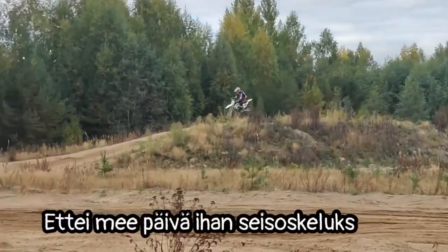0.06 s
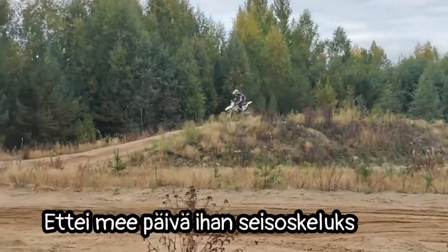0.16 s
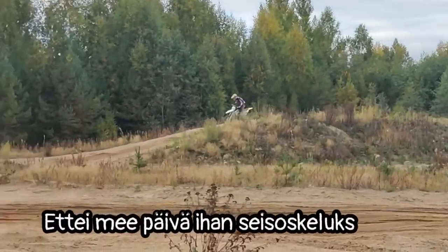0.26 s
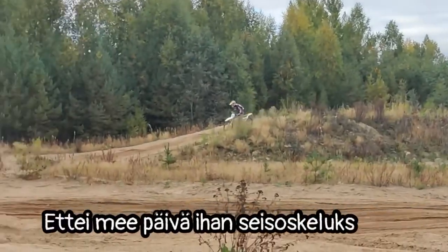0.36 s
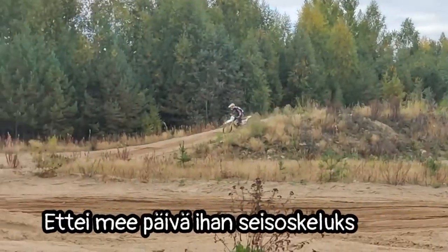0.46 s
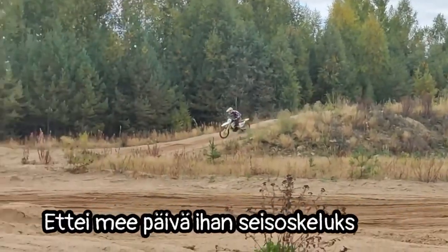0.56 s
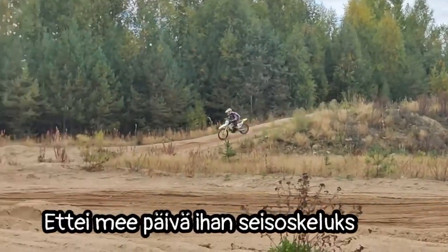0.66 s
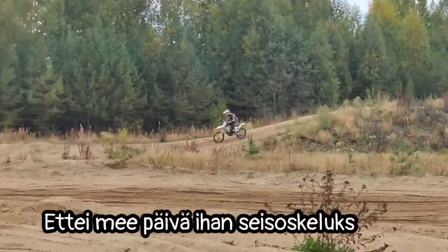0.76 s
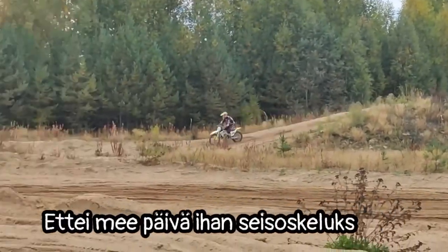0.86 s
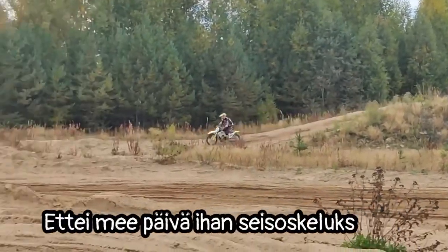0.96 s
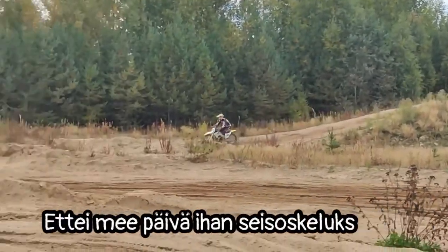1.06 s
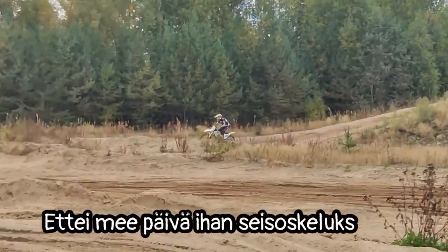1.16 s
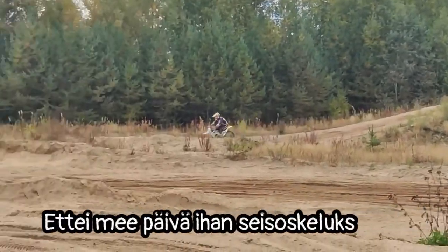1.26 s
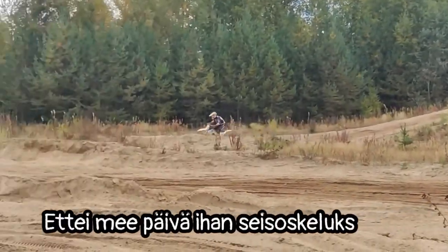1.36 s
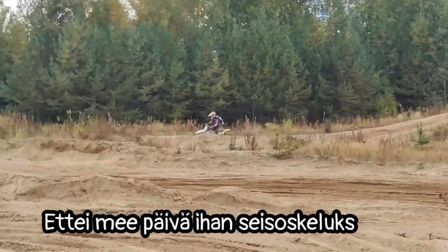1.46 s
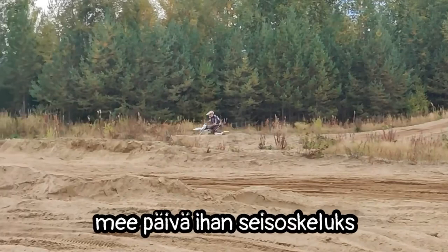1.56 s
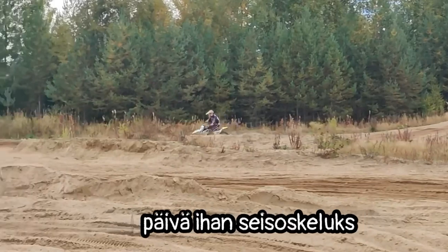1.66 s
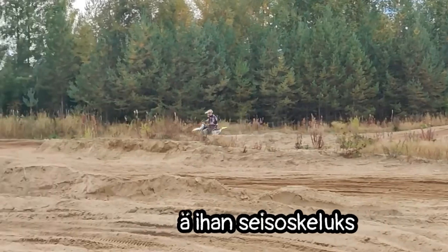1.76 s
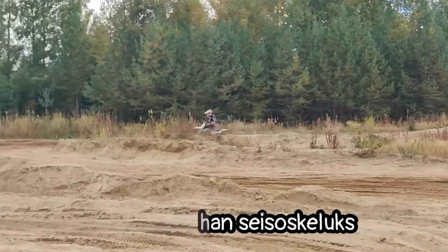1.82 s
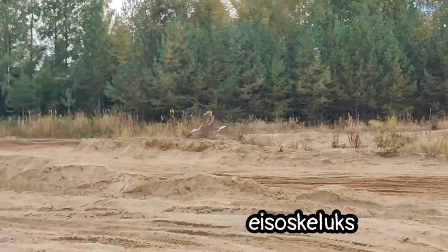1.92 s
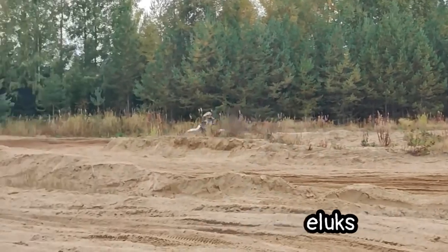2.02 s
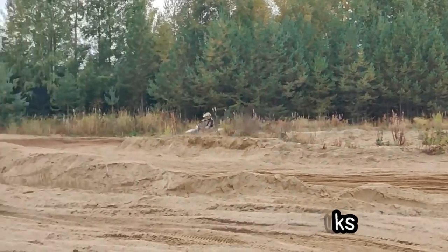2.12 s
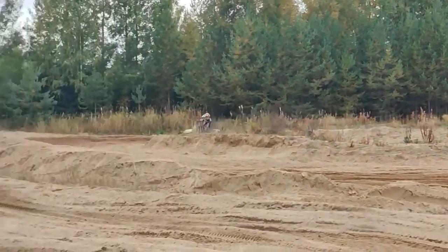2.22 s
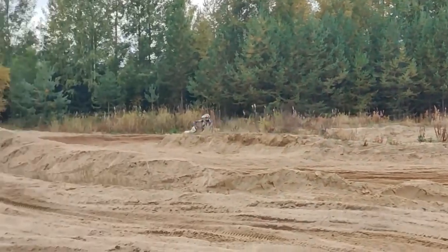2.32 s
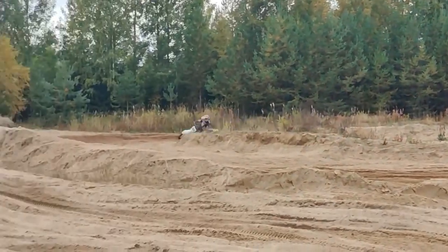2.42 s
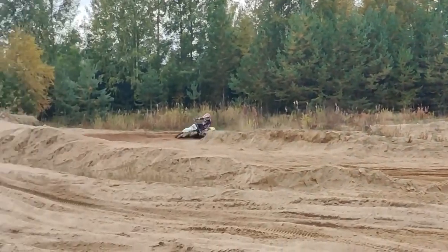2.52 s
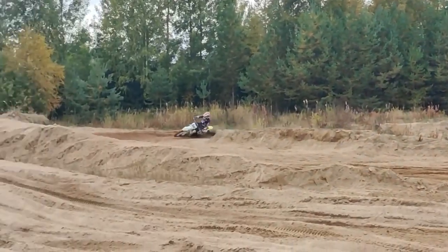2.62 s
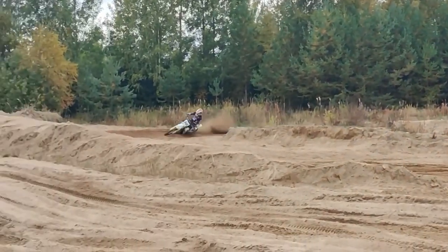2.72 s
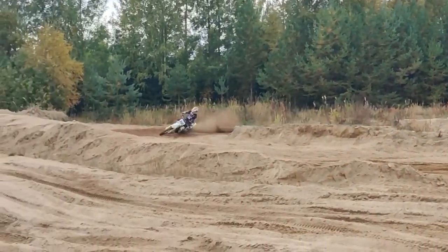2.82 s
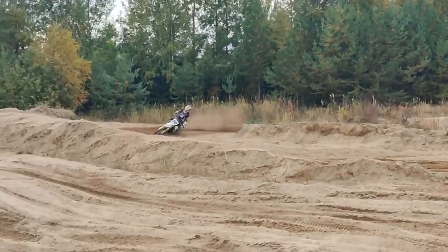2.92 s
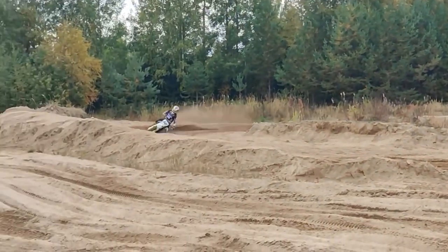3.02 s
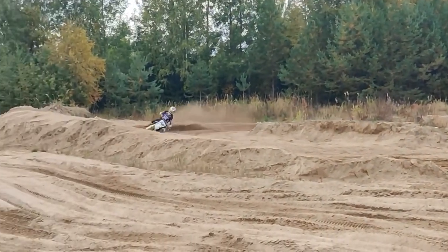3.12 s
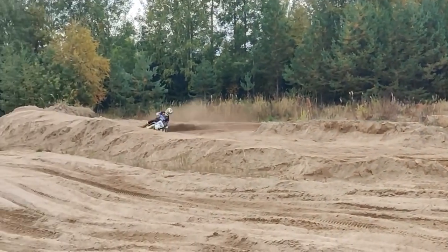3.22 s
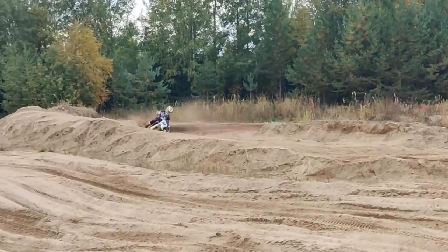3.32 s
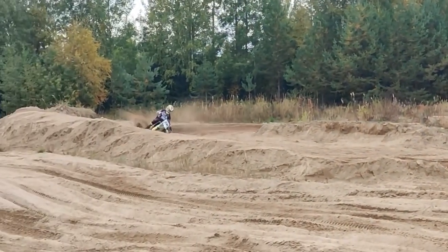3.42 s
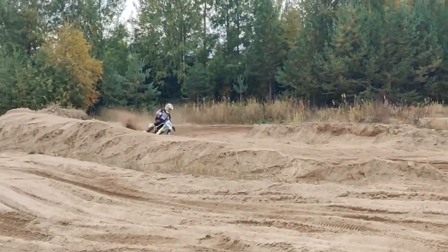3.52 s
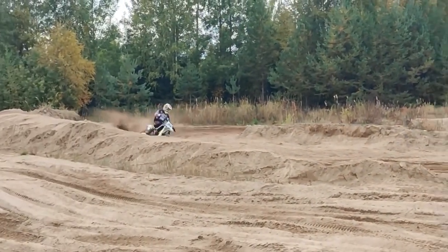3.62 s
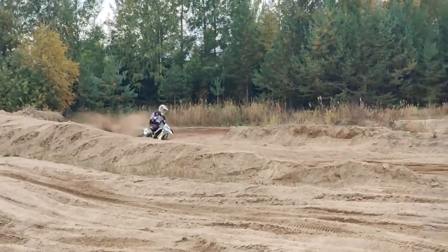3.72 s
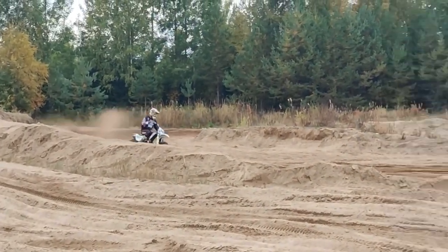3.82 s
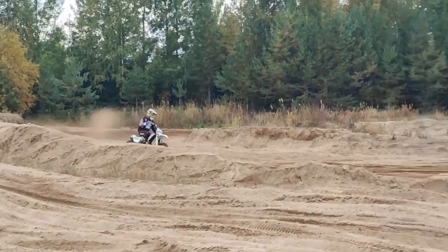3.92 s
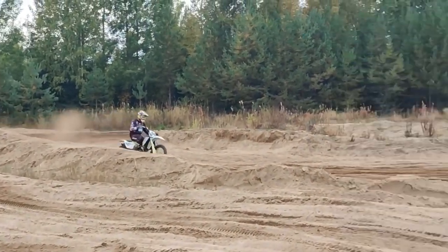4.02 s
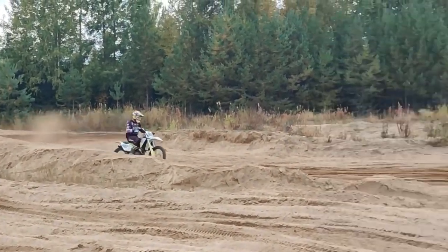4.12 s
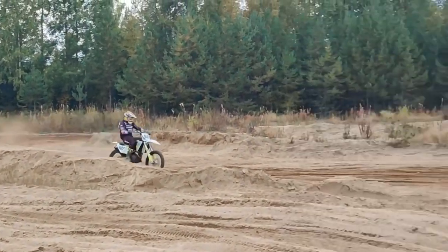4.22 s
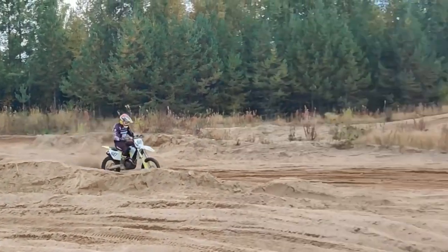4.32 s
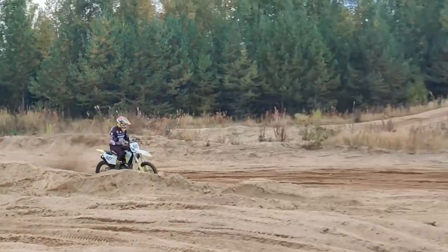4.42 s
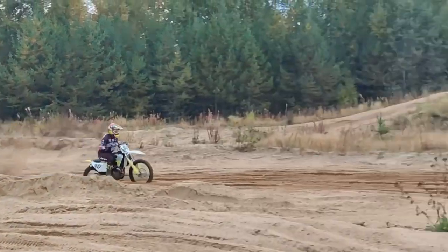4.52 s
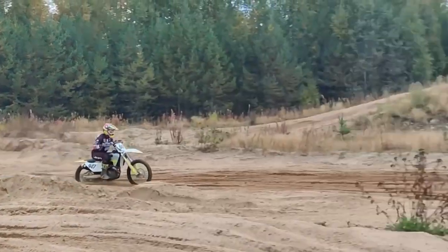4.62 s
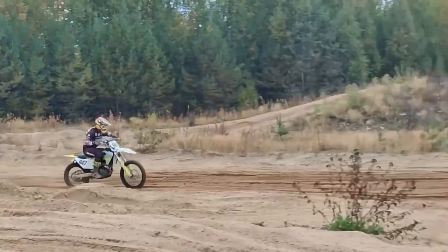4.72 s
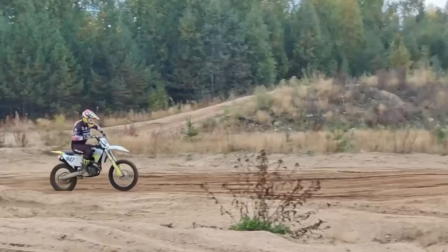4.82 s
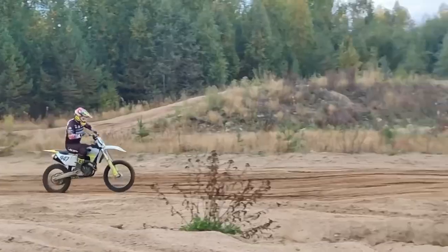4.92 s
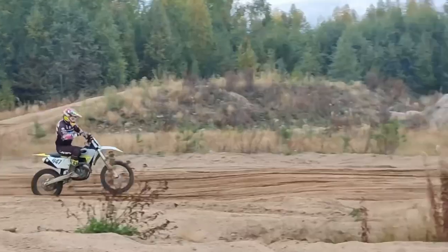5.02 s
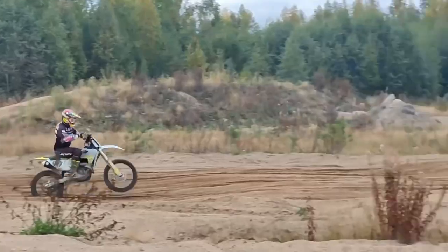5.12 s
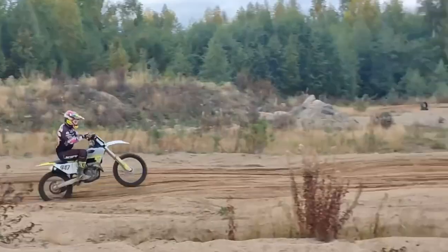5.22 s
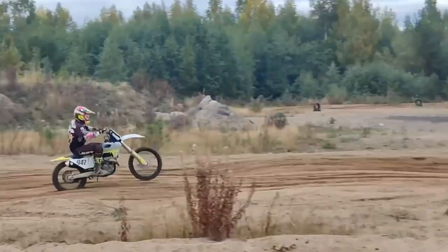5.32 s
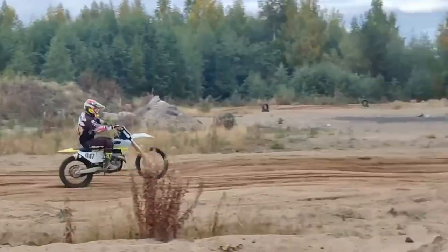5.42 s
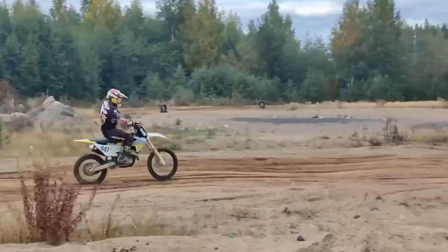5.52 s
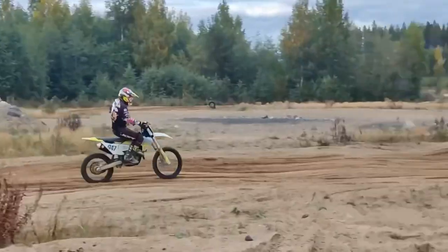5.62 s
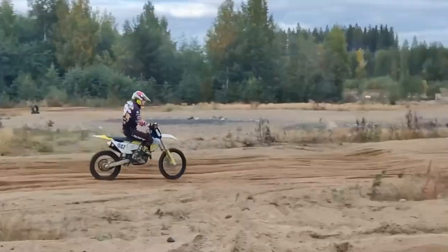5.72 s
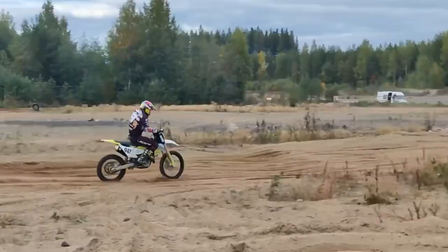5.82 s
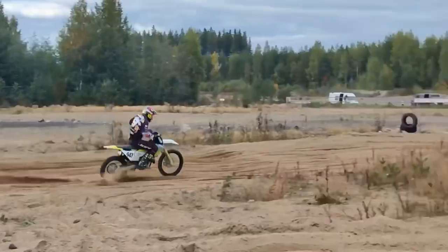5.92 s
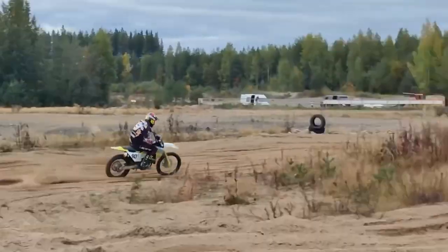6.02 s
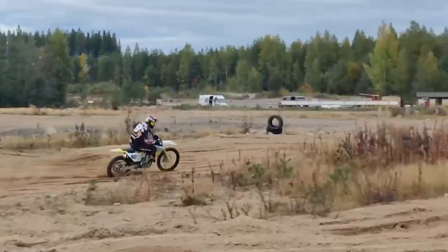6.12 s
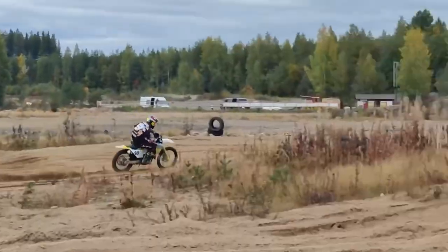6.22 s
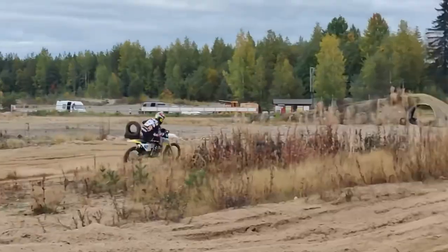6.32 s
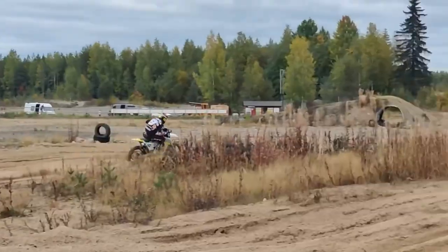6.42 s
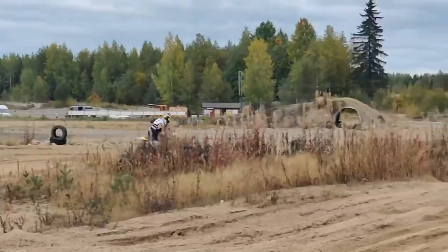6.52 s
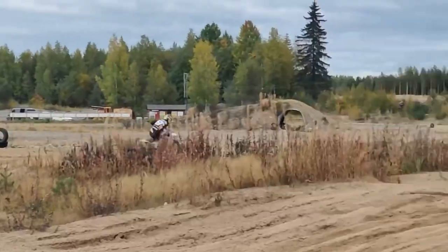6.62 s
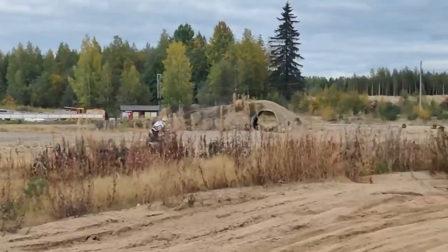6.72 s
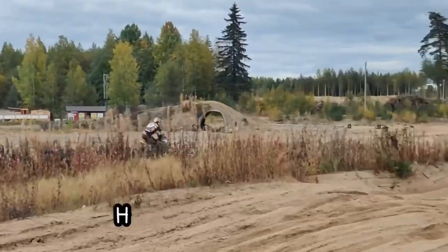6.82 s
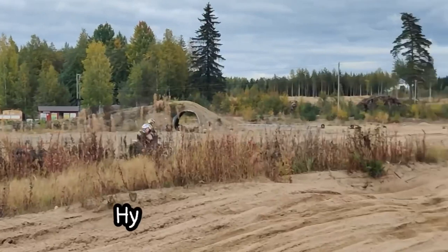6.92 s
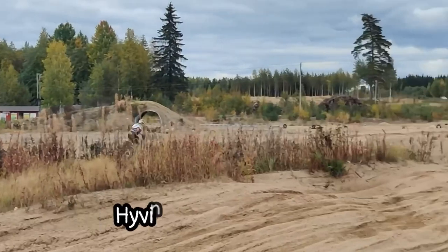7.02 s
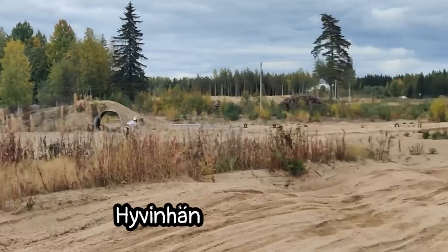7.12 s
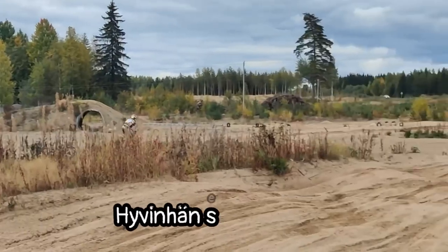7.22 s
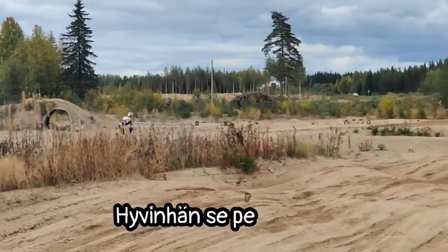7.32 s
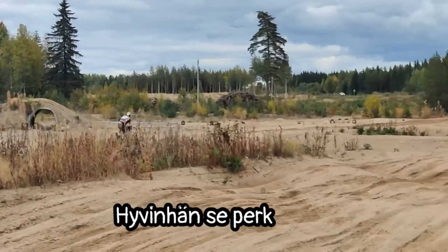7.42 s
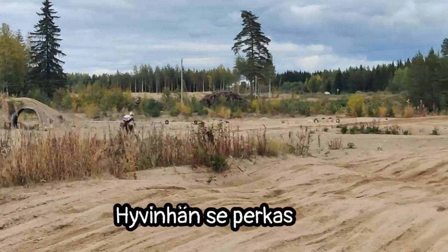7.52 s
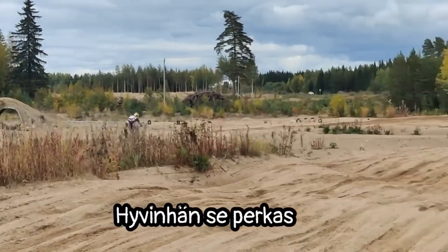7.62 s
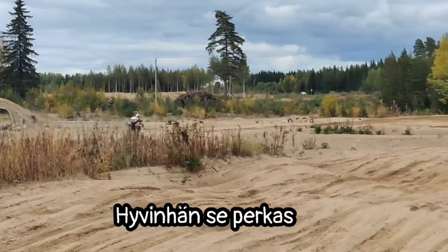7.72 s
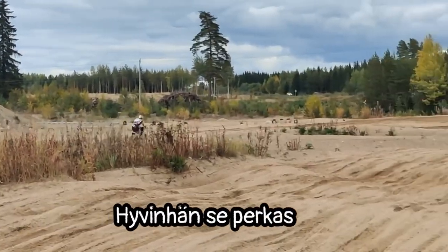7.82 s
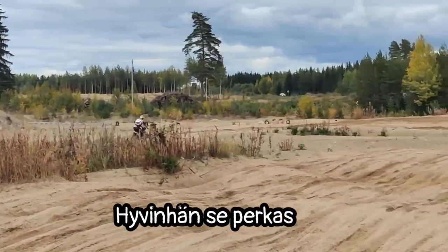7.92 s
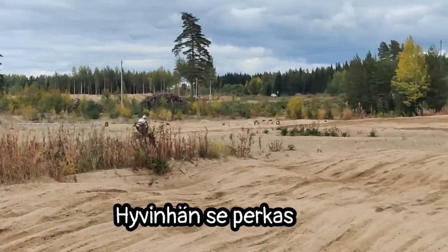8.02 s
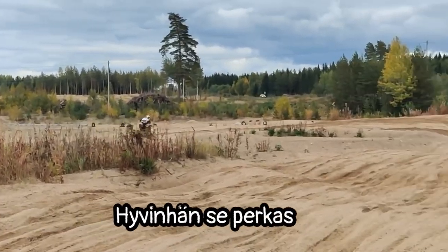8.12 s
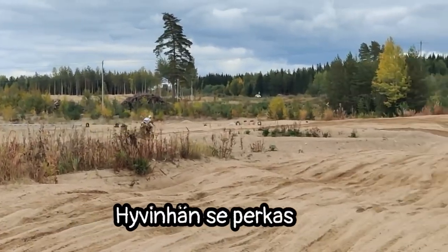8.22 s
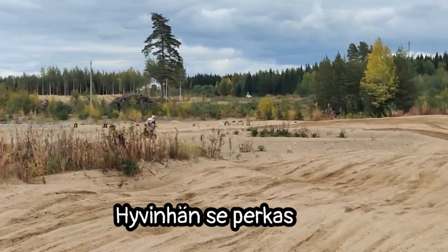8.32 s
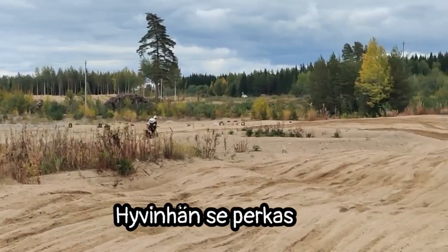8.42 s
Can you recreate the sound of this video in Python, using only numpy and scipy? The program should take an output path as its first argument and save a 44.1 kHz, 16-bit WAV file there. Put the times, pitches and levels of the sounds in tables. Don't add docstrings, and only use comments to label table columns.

```python
import sys
import numpy as np
from scipy import signal
from scipy.fft import rfft, irfft, next_fast_len
from scipy.io import wavfile
from scipy.ndimage import uniform_filter1d, map_coordinates

SR = 44100
rng = np.random.default_rng(int(sys.argv[2]) if len(sys.argv) > 2 else 0)


def invert_db(level):
    return 10 ** (np.asarray(level, dtype=float) / 20)


def master_out(mix):
    frames = np.transpose(np.atleast_2d(mix))
    ceiling = np.clip(frames, -1, 1)
    pcm = np.round(ceiling * 32767).astype(np.int16)
    wavfile.write(sys.argv[1], SR, pcm)


N = 373086


def at(table):
    s, *columns = np.transpose(table)
    return [np.interp(np.arange(N) / SR, s, c) for c in columns]


def shape(x, points):
    hz, db = np.transpose(points)
    size = next_fast_len(N + 8192)
    f = np.maximum(np.fft.rfftfreq(size, 1 / SR), 1)
    gain = invert_db(np.interp(np.log(f), np.log(hz), db))
    return irfft(rfft(x, size) * gain, size)[..., :N]


def steady(x):
    power = uniform_filter1d(uniform_filter1d(x ** 2, size=1800), size=1800)
    return x / np.sqrt(power + 1e-12)


def band(x, lo_hz, hi_hz, order=2):
    return signal.sosfilt(signal.butter(order, [lo_hz, hi_hz], "band", fs=SR, output="sos"), x)


def ring(x, hz, width_hz):
    return signal.lfilter(*signal.iirpeak(hz, hz / width_hz, SR), x)


def gate(rows, smooth_s):
    t = np.arange(N) / SR
    held = np.zeros(N)
    for start_s, end_s, *level in rows:
        held += (level[0] if level else 1) * (t >= start_s) * (t < end_s)
    return uniform_filter1d(held, size=int(smooth_s * SR))


def sway(depth_db, count):
    drift = band(rng.standard_normal((count, N // 100 + 1)), 70, 500, order=1)
    return np.repeat(invert_db(depth_db * drift / drift.std()), 100, axis=1)[:, :N]


# time_s, level_db
WIND = [(0.0, -51), (0.66, -45.5), (1.39, -66), (1.72, -61), (2.24, -61), (4.0, -39.5), (4.64, -53),
        (4.97, -46), (5.54, -58), (6.88, -53.5), (7.28, -41), (8.46, -43)]


def wind():
    mid, side = band(rng.standard_normal((2, N)), 4.0, 68)
    flutter = band(rng.standard_normal(N), 2, 4.8, order=1)
    gain = invert_db(at(WIND)[0] + 1.2 * flutter / flutter.std() + 13.0) / mid.std()
    return gain * np.array([mid + 0.73 * side, mid - 0.44 * side])


FOREST_T60_S, FOREST_DB = .9, -14.5


def forest(x):
    t = np.arange(SR) / SR
    decay = invert_db(-60 * t / FOREST_T60_S) * np.clip(t / 0.022, 0, 1)
    mid, side = rng.standard_normal((2, SR)) * decay
    mid, side = band(mid, 70, 7700, order=1), band(side, 1200, 7000, order=1)
    tail = np.array([mid + side, mid - side])
    tail = tail / np.sqrt(np.sum(tail ** 2, axis=1, keepdims=True))
    return signal.fftconvolve(x[None], tail, axes=1)[:, :N]


# open_s, shut_s, opening (0-1)
THROTTLE = [(-.1, .2, 0.15), (.2, .27, 0.66), (.27, .97, 0.78), (1.33, 1.555, 0.04), (1.8, 2.32, 0.06),
            (2.32, 2.44, 0.34), (2.44, 2.76, 0.63), (2.76, 6.8, 0.88), (7.52, 7.61, 0.49),
            (7.61, 7.88, 0.02), (8.27, 8.36, 0.62)]
TWIST_S, ENGINE_BRAKE_S = 0.026, 0.09


def throttle():
    grip = np.clip(gate(THROTTLE, TWIST_S), 0, 1.1)
    keep = np.exp(-1 / (ENGINE_BRAKE_S * SR))
    return np.maximum(grip, signal.lfilter([1 - keep], [1, -keep], grip))


# start_s, length_s, depth
STUTTERS = [
    (.33, .19, .35),
    (.97, .08, 1),
    (4.3, .19, .7),
    (5.835, .095, 1.6),
    (6.82, .06, 1),
]


def limiter():
    return gate([(s, s + length_s, depth) for s, length_s, depth in STUTTERS], .04)


BEATS_S = [.385, 1.762, 4.703, 4.7755, 4.8495, 5.853, 7.552, 7.632, 8.267, 8.2895, 8.3105, 8.33]
SKIP_DB = -6


def firings(hz, scatter_db, stutter):
    wobble = band(rng.standard_normal(N), 7.0, 30, order=1)
    turns = np.cumsum(hz * (1 + 0.0007 * wobble / wobble.std())) / SR
    early = np.unwrap(-turns[(np.array(BEATS_S) * SR).astype(int)] % 1, period=1)
    turns = turns + 1 + at(np.transpose([BEATS_S, early]))[0]
    cycle = turns.astype(int)
    skipped = (cycle - cycle[int(BEATS_S[5] * SR) + 99]) % 2
    weakness, unevenness = rng.standard_normal((1200, 2))[cycle].T
    size = invert_db(scatter_db * -np.abs(weakness) * 1.2 + SKIP_DB * stutter * skipped)
    late = turns % 1 * SR / hz
    clicks = np.maximum(0, 1 - np.abs(late - 1)) * size * invert_db(0.5 * unevenness)
    return turns, size, clicks


# pitch_hz, throttle_shut_db, throttle_open_db, added_behind_tail_pipe_db
PIPE = [(44.7, -3, -13, 7.5), (71.4, 3, 2.5, -4), (100, -4, -2, 4), (137.3, 1, -4.5, 5),
        (177, -7.5, -2, 0.5), (240, -13.5, -4.5, 10.5), (304, -28.5, -10, 21.5), (453, -25.5, -20, 9)]
# time_s, second_over_first_order_db
FLANK = [(0, -6), (.4, -4.5), (1, 1), (2.6, -1.5), (3.3, -3.5), (3.75, 8), (4.3, 1), (4.75, 7), (5.1, -6),
         (5.45, 0), (6.1, -1), (6.6, 0), (7.5, 3.5), (8.46, -3)]
PART_THIRD_DB, OVERRUN_FIRST_DB = -12.5, -31
SHUT_FIRST_DB, SHUT_THIRD_DB = -10, 2.5


def exhaust_orders(hz, level_db, load, tail):
    pipe_hz, *pipe_db = np.transpose(PIPE)
    orders_db = []
    for k in range(1, 5):
        shut_db, open_db, tail_db = (np.interp(np.log(k * hz), np.log(pipe_hz), db) for db in pipe_db)
        orders_db.append(level_db + shut_db + load * (open_db - shut_db) + tail * tail_db)
    first, second, third, fourth = orders_db
    overrun = tail * np.clip(1 - load / 0.21, 0, 1)
    part = np.clip(gate(THROTTLE, 0.044) / 0.073, 0, 1) * np.clip((.8 - load) / 0.77, 0, 1)
    shut = (1 - tail) * np.clip(1 - gate(THROTTLE, .03) / .04, 0, 1)
    flank_db, = at(FLANK)
    first = first + OVERRUN_FIRST_DB * overrun + SHUT_FIRST_DB * shut - flank_db / 2
    second = second + flank_db / 2
    third = third + PART_THIRD_DB * part + SHUT_THIRD_DB * shut
    return [first, second, third, fourth]


SAND_DB, SAND_OCTAVES = -16, .12


def sand(hz, dip_hz):
    return SAND_DB * np.exp(-.5 * (np.log2(hz / dip_hz) / SAND_OCTAVES) ** 2)


ORDER_TURNS = [-.18, .1, .35, .4, .45, .5, .55, .6, .65, .7, .75]
HEADER_HZ, HEADER_DB, HEADER_OCTAVES = 390, 4, 0.18


def boom(hz, turns, size, orders_db, bark_db, hiss_db, dip_hz):
    slow = np.clip((80 - hz) / 30, 0, 1)
    upper_db = []
    for k in range(5, 11):
        silencer_db = -22.6 * np.log10(1 + (k * hz / 440) ** 8)
        header = np.exp(-.5 * (np.log2(k * hz / HEADER_HZ) / HEADER_OCTAVES) ** 2)
        slope_db = -(0.21 + 2.0 * slow) * (k - 4)
        upper_db.append(bark_db + slope_db + silencer_db + HEADER_DB * slow * header)
    tones = np.zeros(N)
    for k, (db, turn) in enumerate(zip(orders_db + upper_db, ORDER_TURNS), 1):
        tones += invert_db(db + sand(k * hz, dip_hz)) * np.cos(2 * np.pi * (k * turns - turn))
    bursts = 3.3 + np.exp(-(turns % 1) / 0.23)
    rumble = steady(band(bursts * rng.standard_normal(N), 200, 710))
    rumble = invert_db(bark_db - 8.0 + 2 * slow + .5 * slow * hiss_db) * rumble
    size = uniform_filter1d(size, size=130)
    return (np.sqrt(2) * tones + rumble) * size / uniform_filter1d(size, size=4000)


# pitch_hz, width_hz, level_db
SILENCER = [(682, 397, 0), (1051, 65, 2.5), (1617, 361, 12), (2313, 562, 12.5), (2804, 1260, 1.5),
            (5520, 2620, -14.5), (6300, 3470, -18.5)]


def silencer(x, beam=None):
    rings = np.array([(-1) ** k * invert_db(db) * ring(x, hz, width_hz)
                      for k, (hz, width_hz, db) in enumerate(SILENCER)])
    return np.sum(rings if beam is None else rings * beam, axis=0)


# pitch_hz, level_db
GAS = [(200, -62), (600, -32), (1500, -26), (3000, -18.5), (6500, -8), (7500, -5.5), (9000, -47.5),
       (12000, -4), (15500, -25)]


def crack(hz, turns, size, clicks, hiss_db):
    since_s = turns % 1 / hz
    puff = size * (1 - np.exp(-since_s / .002)) ** 3 * np.exp(-since_s / .0018)
    beam = sway(3, count=len(SILENCER))
    front = steady(silencer(band(clicks, 500, 4000, order=1), beam))
    gas = steady(silencer(shape(puff * rng.standard_normal(N), GAS)))
    gas = gas + invert_db(4) * band(gas, 1400, 2700)
    hiss = steady(silencer(band(rng.standard_normal(N), 1300, 15000, order=1)))
    gas_db = -9 - .45 * np.minimum(hiss_db + 6, 0)
    return front, invert_db(gas_db) * gas, invert_db(hiss_db - 2) * hiss


VALVE_PEAK_S, VALVE_OPEN_S, VALVE_DEPTH = .0022, .002, .75


def valve(hz, turns, hiss_db):
    depth = np.clip(-(hiss_db + 5) / 9, 0, VALVE_DEPTH)
    opening = np.exp(-((turns % 1 / hz - VALVE_PEAK_S) / VALVE_OPEN_S) ** 2)
    return steady(1 - depth + depth * opening)


# time_s, lower_over_upper_ring_db, treble_db, upper_orders_db
BEAM = [(0, 20, 4.5, 6), (.35, 18.5, 7, 15), (1, 5.5, 2, 2), (2.3, 5, 8.5, 3), (2.8, 10, 18.5, 8),
        (3.4, -8, -4.5, 1), (3.9, -14, -1, 5), (4.35, -23, 0.5, 6.5), (4.75, -8, -3, 3.5),
        (5.1, 4.5, -1, -1.5), (5.5, -14, -5.5, 5.5), (6.1, -10, -2.5, 6.5), (6.65, -15.5, -1, 5),
        (7.1, -22, -4, -1), (7.56, -16, -0.5, 5.5), (7.9, -4, -1.5, -1), (8.3, 1, 1, 10.5),
        (8.46, -4, 6.5, -6)]
# pitch_hz, width_hz, level_db
RINGS = [(1645, 280, -2.5), (2260, 180, 0)]
CLEAN_DB, RASP_NOISE_DB = -7, -4


def aim(front, gas, hiss, rasp_db, crack_db, tilt_db, air_db, near_db, load, burst):
    lower_db, treble_db, _ = at(BEAM)
    far = front + gas + hiss + np.clip(1.2 - .2 * near_db, 0, 1.5) * hiss
    noisy = invert_db(CLEAN_DB * load)
    clean = front + np.sqrt(noisy) * gas + noisy * hiss
    struck = front + .35 * gas
    lower, upper = (load * invert_db(db) * ring(ring(struck, hz, width_hz), hz, width_hz)
                    for hz, width_hz, db in RINGS)
    rings = invert_db(lower_db / 2) * (band(clean, 1350, 1950) + lower)
    rings = rings - invert_db(-lower_db / 2) * (band(clean, 1950, 2750) + upper)
    treble = band(far, 2850, 7000) + invert_db(air_db) * band(far, 7000, 16000)
    top = burst * rings + burst ** .3 * invert_db(tilt_db + treble_db) * treble
    rasp = band(front + noisy * invert_db(RASP_NOISE_DB) * (gas + hiss), 504, 1127)
    return invert_db(rasp_db) * steady(rasp) + invert_db(crack_db) * steady(top)


# time_s, peak_db
POPS = [
    (1.761, -31),
    (2.054, -37),
    (2.126, -36),
    (5.854, -26),
    (5.926, -25),
    (6.205, -23),
]


def pops():
    out, t = np.zeros(N), np.arange(800) / SR
    for (s, db), noise in zip(POPS, rng.standard_normal((len(POPS), 800))):
        start = int(s * SR)
        out[start:start + 800] += invert_db(db + 10) * noise * np.exp(-t / .003)
    return .5 * silencer(out) + 2 * band(out, 300, 1300) + .5 * band(out, 2800, 6500)


# start_s, end_s, pitch_hz, over_exhaust_level_db
HONKS = [(0.252, 0.51, 950, -13), (0.255, .5, 687, -11), (0.273, 0.465, 2280, -20),
         (0.807, 0.968, 2260, -14), (0.803, 0.968, 1710, -24), (2.5, 2.8, 3930, -24.5),
         (2.85, 3.398, 645, -17.5), (3.206, 3.6, 906, -28), (3.297, 3.597, 3070, -13),
         (3.554, 3.71, 2290, -19.5), (3.664, 3.796, 1660, -14), (3.927, 4.05, 2240, -18),
         (3.98, 4.2, 1685, -14.5), (4.257, 4.455, 2250, -17), (4.685, 4.898, 1880, -4),
         (5.002, 5.22, 2300, -12), (5.275, 5.45, 2300, -15), (5.78, 6.12, 2200, -17),
         (6.0, 6.304, 790, -25), (6.447, 6.776, 640, -12.5), (7.53, 7.937, 748, -18),
         (7.514, 7.616, 483, -7.5), (7.536, 7.604, 1600, -17.5), (8.258, 8.36, 524, -11.5)]
HONK_WIDTH_HZ, HONK_WIDTH_SHARE = 70, .1


def honk(clicks, level_db):
    out = np.zeros(N)
    for start_s, end_s, hz, db in HONKS:
        span = slice(int((start_s - .04) * SR), int((end_s + .04) * SR))
        width_hz = HONK_WIDTH_HZ + HONK_WIDTH_SHARE * hz
        tone = steady(ring(ring(clicks[span], hz, width_hz), hz, width_hz))
        fade = signal.windows.tukey(len(tone), min(1, .16 * SR / len(tone)))
        out[span] += invert_db(db) * tone * fade
    return invert_db(level_db) * out


# time_s, nearness_db, tail pipe facing the phone (0-1),
# ground_echo_dip_hz, intake_rasp_db
BEARING = [(0, -6, 0.73, 203, 3), (.4, -8, 1, 177, 8), (.9, -10.5, 0.8, 188, 5.5),
           (1.3, -8.5, 0, 195, -1.5), (2.3, -14, 0.04, 240, 4.5), (2.65, -10.5, 0.6, 271, 0),
           (3.2, -13, 0.33, 344, 2.5), (3.5, -6, 0.79, 323, 5.5), (3.75, -3, 0.25, 363, 0.5),
           (4.25, -1.5, 0.07, 297, -1), (4.75, 2.5, 0.29, 228, -6.5), (5.12, 1.5, 0.66, 264, 1),
           (5.42, -1, 0.5, 231, -3), (5.75, 1.5, 0.82, 238.6, 0.5), (6.7, -6.5, 0.52, 234, -3),
           (7, -2, 0.66, 256, -5.5), (7.65, -8.5, 1, 240, -1.5), (8.46, -12.5, 0.8, 240, 2)]
CRACK_DB, CRACK_SHUT_DB, CRACK_PER_LEVEL = -19, -13, 0.99
BARK_DB, BARK_TAIL_DB, RASP_DB, RASP_TAIL_DB = -17, 3.5, -9.5, -0.5
BRIGHT_DB, BRIGHT_PER_NEAR = 9.5, -0.03
HISS_SHUT_DB, HISS_OPEN_DB, HISS_PER_HZ, HISS_PER_NEAR, HISS_STUTTER_DB = 4, -5, .27, -.5, 3
EVEN_DB, IDLE_SCATTER_DB, STUTTER_DB = 1, 1.3, 4
CRACK_LATE_S = .0008


def bike(hz, level_db, near_db, air_db):
    _, tail, dip_hz, rasp_db = at(BEARING)
    load, stutter = throttle(), limiter()
    orders_db = exhaust_orders(hz, level_db, load, tail)
    crack_db = CRACK_DB + near_db + CRACK_SHUT_DB * (1 - load) + CRACK_PER_LEVEL * (level_db + 23.5)
    bark_db = level_db + BARK_DB + BARK_TAIL_DB * load * tail + at(BEAM)[2]
    pulling_db = HISS_OPEN_DB + HISS_PER_HZ * (np.minimum(hz, 100) - 95)
    pulling_db = pulling_db + HISS_PER_NEAR * near_db + HISS_STUTTER_DB * stutter
    hiss_db = HISS_SHUT_DB + np.minimum(load / .72, 1) * (pulling_db - HISS_SHUT_DB)
    scatter_db = EVEN_DB + IDLE_SCATTER_DB * (1 - load) + STUTTER_DB * np.minimum(stutter, 1)
    turns, size, clicks = firings(hz, scatter_db, stutter)
    front, gas, hiss = crack(hz, turns, size, clicks, hiss_db)
    rasp_db = crack_db + rasp_db + RASP_DB + RASP_TAIL_DB * tail * load
    tilt_db = BRIGHT_DB + BRIGHT_PER_NEAR * near_db
    burst = valve(hz, turns, hiss_db)
    sharp = aim(front, gas, hiss, rasp_db, crack_db, tilt_db, air_db, near_db, load, burst)
    sharp = np.roll(sharp, int(CRACK_LATE_S * SR)) + pops() + honk(clicks, level_db)
    low = boom(hz, turns, size, orders_db, bark_db, hiss_db, dip_hz)
    return low, sharp


# pitch_hz, left_minus_right_db
PORTS = [(100, 0), (250, -2), (500, 5), (1000, -2), (1650, 3), (2300, -0.5), (4000, -1.5), (8000, 14),
         (12000, 0.5)]


def ports(x, lag, pan_db):
    right = map_coordinates(x, [np.arange(N) - lag], order=3, mode="nearest")
    left = 0.63 * x + 0.3 * right
    half = np.array(PORTS) * [1, .5]
    left = invert_db(pan_db / 2) * shape(left, half)
    right = invert_db(-pan_db / 2) * shape(right, half * [1, -1])
    direct = np.array([left, right])
    eddies = band(rng.standard_normal((2, N)), 170, 830, order=1)
    return direct + .3 * eddies / eddies.std() * band(direct, 2900, 15000)


# time_s, firing_rate_hz, exhaust_level_db
HILL = [(0.0, 94.82, -15.5), (0.2, 83.24, -21), (0.33, 115.6, -14), (0.48, 113, -18.5), (0.55, 95.96, -18),
        (0.72, 82.57, -16), (0.89, 104.4, -12.5), (0.96, 97.6, -16), (1.06, 63.17, -18)]
COAST = [(1.151, 51.4, -17.5), (1.299, 41.9, -25), (1.549, 66.07, -20.5), (1.648, 52.8, -21),
         (1.762, 38.4, -26.5), (1.861, 47.5, -23), (2.242, 58.75, -20.5), (2.332, 71.63, -20.5),
         (2.472, 95, -16), (2.552, 75.7, -15)]
TURN = [(2.645, 67.96, -17), (2.85, 81.08, -15), (3.062, 96.05, -15.5), (3.252, 92.2, -13.5),
        (3.478, 76.66, -17), (3.702, 90.9, -16.5), (3.859, 100, -16), (4.091, 91.12, -16.5),
        (4.25, 94.3, -16)]
PASS = [(4.331, 114.3, -14), (4.45, 116.1, -17.5), (4.549, 91.24, -16.5), (4.73, 67.95, -18.5),
        (4.849, 86.33, -18), (5.088, 108.1, -17.5), (5.159, 100.7, -16.5), (5.35, 80.27, -16),
        (5.459, 75.77, -17.5)]
AWAY = [(5.579, 94.05, -20), (5.651, 100, -14.5), (5.888, 108.7, -24.5), (5.961, 103.1, -15.5),
        (6.05, 88.3, -18.5), (6.201, 91, -19), (6.268, 80.3, -16.5), (6.64, 100.8, -14.5),
        (6.759, 104.7, -13)]
ROLL = [(6.86, 78.94, -27.5), (6.951, 61.51, -25.5), (7.12, 43.26, -24), (7.258, 38.43, -26),
        (7.35, 42.66, -26.5), (7.431, 41.4, -29)]
BLIPS = [(7.559, 59, -19.5), (7.659, 67.3, -25), (7.839, 56.74, -23), (7.962, 42.75, -22.5),
         (8.126, 39.77, -28), (8.203, 32.9, -29.5), (8.3, 52.35, -19.5), (8.378, 61.1, -21.5),
         (8.46, 56.7, -18)]
# time_s, right port lag (samples), left_minus_right_db, air_above_7_khz_db
PATH = [(0, 3, 0, -14), (.5, 3.1, 0, -18), (1.1, 3.3, .4, -12), (1.5, 3.5, .5, -4), (2.5, 4.5, .3, -7),
        (3.5, 6, 1.4, -6), (4.1, 8, 1.2, 2), (5.2, 9, 2.6, 4), (6.2, 8, .8, 3), (6.8, 8, .3, 2),
        (7, 8, 1, -5), (8.46, 8, .6, -3)]
WET_PER_NEAR, FOREST_CRACK_DB = -1, -5


def scene():
    hz, level_db = at(HILL + COAST + TURN + PASS + AWAY + ROLL + BLIPS)
    near_db = at(BEARING)[0]
    lag, pan_db, air_db = at(PATH)
    low, sharp = bike(hz, level_db, near_db, air_db)
    direct = ports(low + sharp, lag, pan_db)
    to_forest = invert_db(WET_PER_NEAR * np.maximum(near_db, 0) + FOREST_CRACK_DB) * sharp + low
    return direct + invert_db(FOREST_DB) * forest(to_forest) + wind()


def top_cut(x):
    return signal.sosfilt(signal.butter(12, 15380, fs=SR, output="sos"), x)


# pitch_hz, level_db
PHONE = [(470, -3.5), (530, -6.5), (600, 1.5), (1240, 7), (1370, -1.5), (1490, 9.5), (1940, -1.5),
         (2050, -5.5), (2150, -2), (2620, -2), (2780, -3), (2950, 4), (4000, 6.5), (4250, 4.5), (4500, 8),
         (6200, 14.5), (7600, 0.5), (12000, -10), (15000, -3.5)]


def record(dry):
    heard = np.tanh(0.92 * shape(dry, PHONE))
    return top_cut(heard)


dry = scene()
out = record(dry)
master_out(out)
```